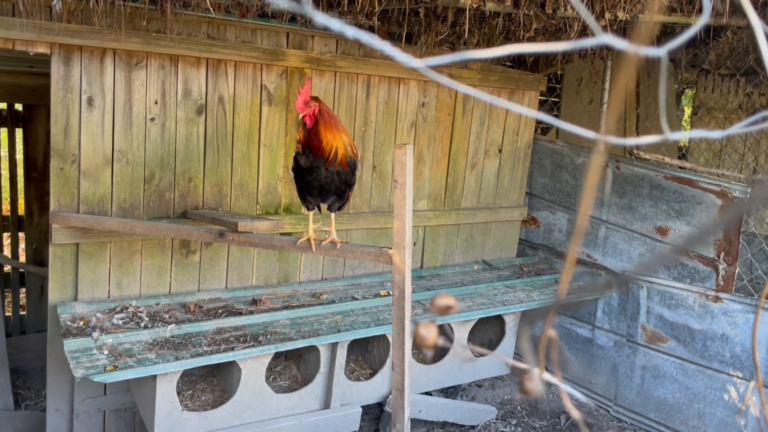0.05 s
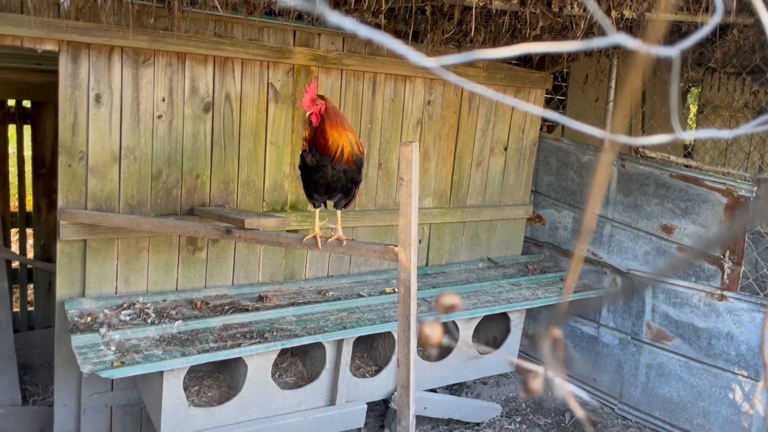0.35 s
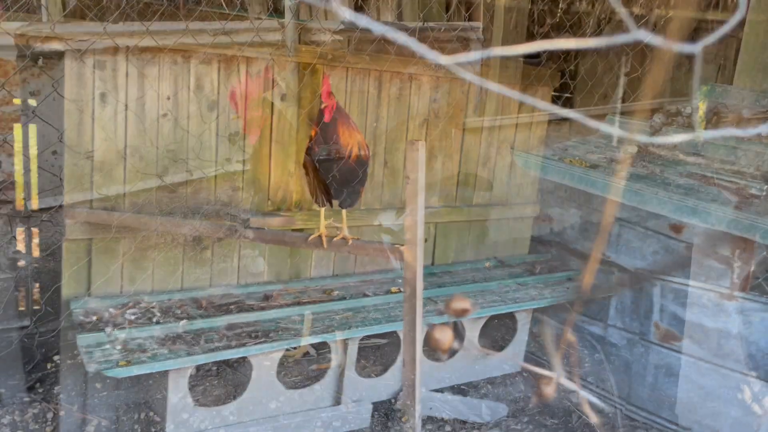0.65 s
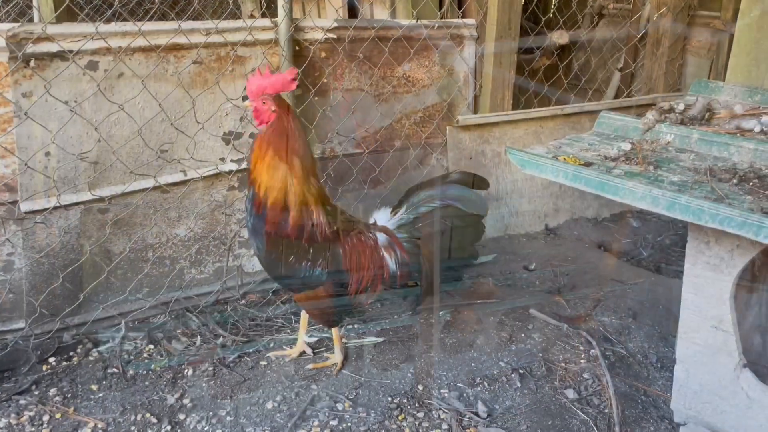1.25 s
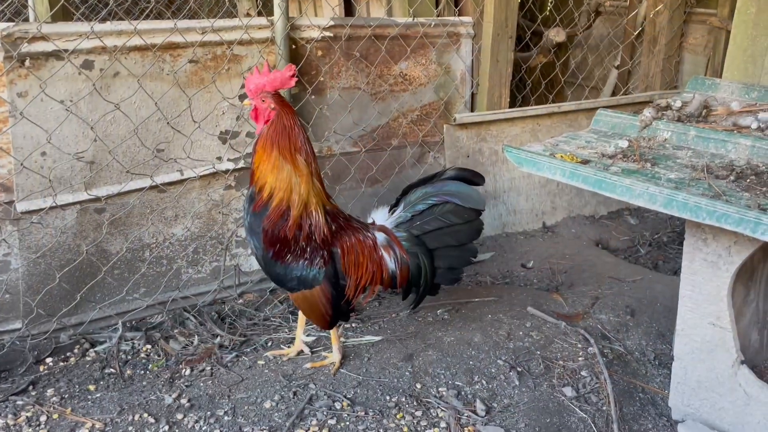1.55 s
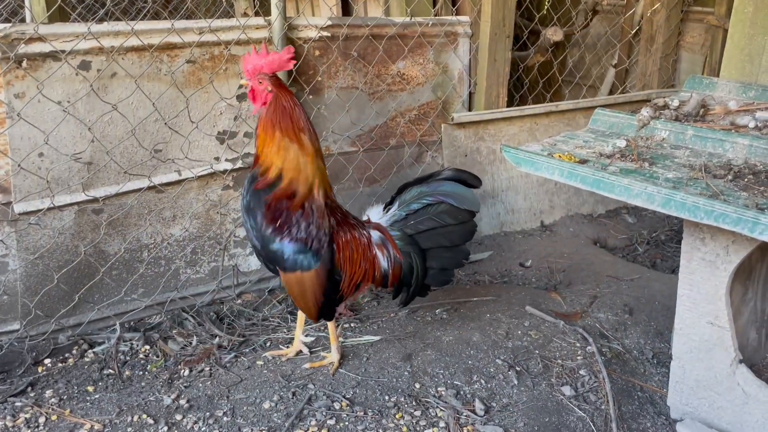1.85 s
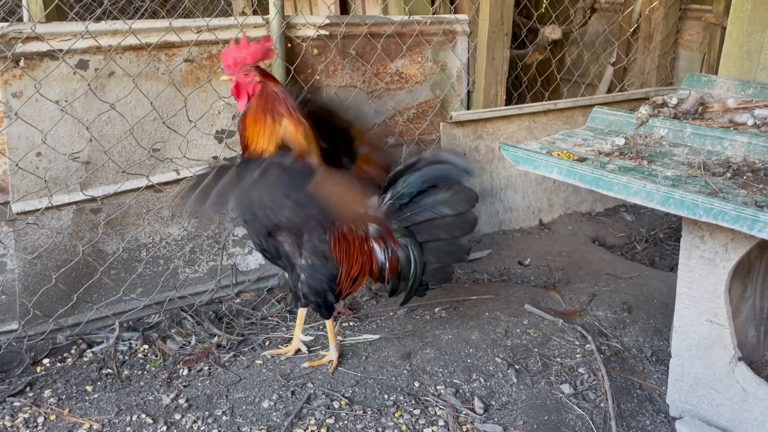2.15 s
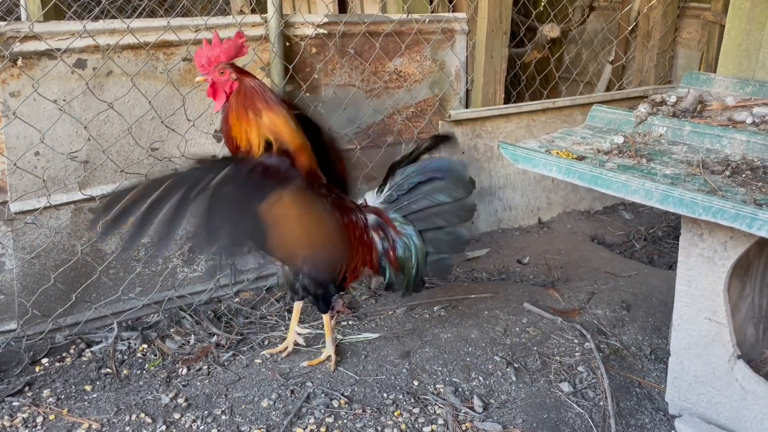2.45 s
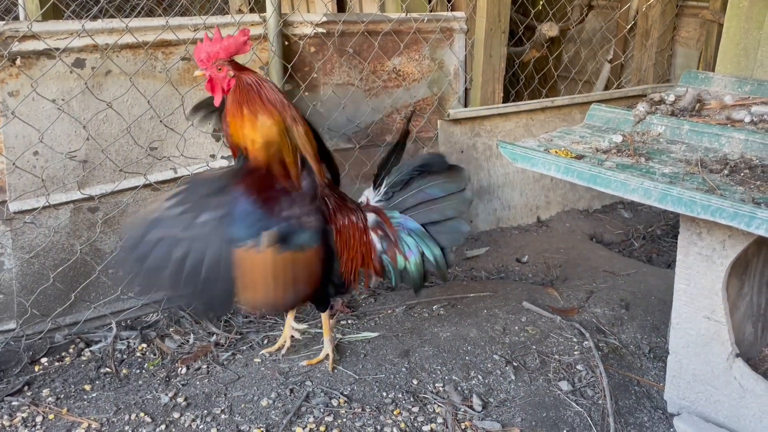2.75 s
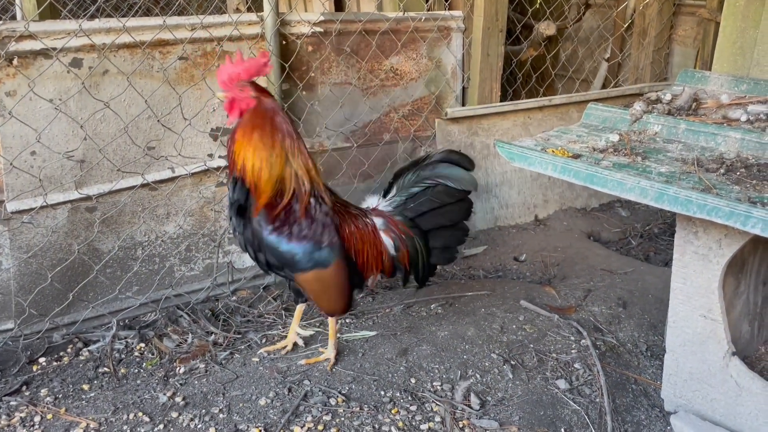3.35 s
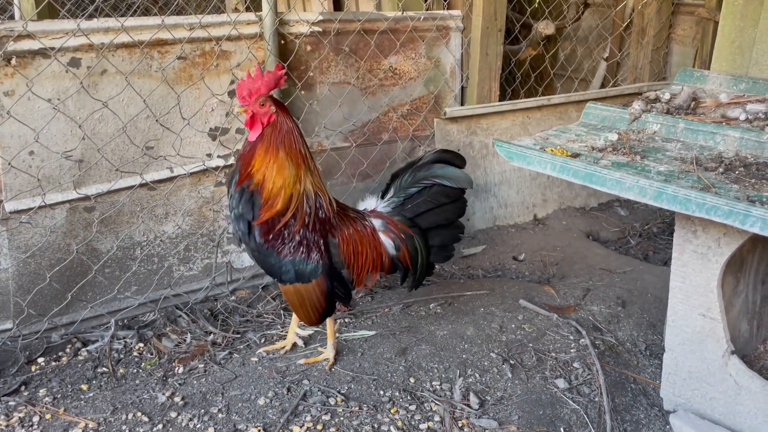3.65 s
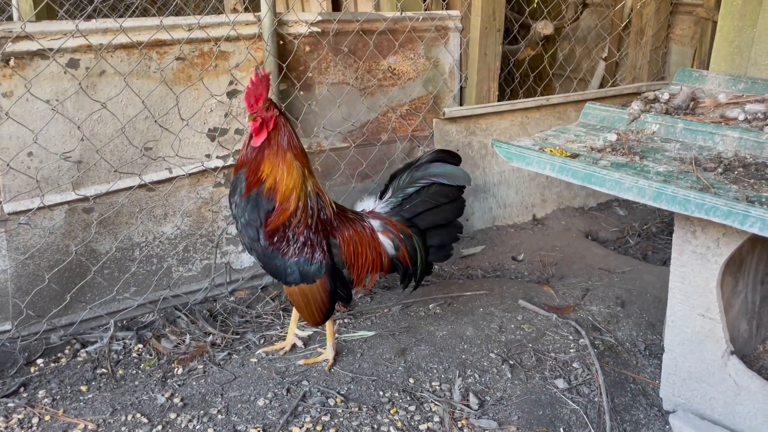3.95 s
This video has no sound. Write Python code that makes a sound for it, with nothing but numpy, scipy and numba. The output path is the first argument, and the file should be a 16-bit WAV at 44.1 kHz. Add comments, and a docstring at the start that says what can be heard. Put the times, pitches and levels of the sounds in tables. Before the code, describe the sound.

Rooster clucking softly, then loudly after beating his wings, with faint small birds outdoors.

```python
"""Rooster in a fenced pen

A rooster clucks softly, draws out a low two-voiced growl, beats his wings and ends with four loud
notes: cluck, squawk, cluck, cluck. His voice is a source and a filter: pulses from the syrinx excite
resonances of throat, body and beak. His wings push air and rustle. Small birds peep nearby, and
boards and walls add a short echo to the calls, over a quiet outdoor background that swells early on."""
import sys
import numpy as np
from scipy import signal
from scipy.fft import rfft, irfft
from scipy.io import wavfile
from scipy.ndimage import map_coordinates
from numba import njit

SR = 44100
rng = np.random.default_rng(int(sys.argv[2]) if len(sys.argv) > 2 else 0)


def transcribe(signal):
    """Save signal, clipped to [-1, 1], as a 16-bit WAV file at the path in sys.argv[1]."""
    frames = np.atleast_2d(signal).T
    limited = np.clip(frames, -1, 1)
    pcm = np.round(limited * 32767).astype(np.int16)
    wavfile.write(sys.argv[1], SR, pcm)


N = 176400
T = np.arange(N) / SR

# clucks (peak time [s], rise [s], pitch [Hz], level [dB], throat resonance [Hz], beak re throat [dB])
CLUCK_NOTES = [(0.476, 0.021, 304.3, -59.5, 630, -21), (0.587, 0.014, 272.3, -55, 504, -31),
               (.733, 0.018, 220.8, -47, 926, -21.5), (0.909, 0.035, 212.7, -44, 805, -18),
               (1.819, 0.031, 215.7, -33, 832, -19), (3.2, .023, 268.2, -28, 870, -12),
               (3.414, .019, 252.1, -27, 865, -6.5), (3.6, 0.019, 277.6, -27, 819, -13.5)]
# resonances of the body (frequency [Hz], bandwidth [Hz], gain [dB])
BODY_MODES = [(238, 180, -14.5), (636, 520, -8)]
# resonances of the open beak (frequency [Hz], bandwidth [Hz], gain [dB])
BEAK_MODES = [(2012, 134, -3.5), (2280, 85, -2.5), (2590, 390, -14.5), (3750, 65, -19), (6220, 220, -22)]
# louder clucks keep less bass (level [dB], high-pass cutoff [Hz])
CLUCK_BASS_CUT = [(-47, 130), (-27, 340)]
# fundamental of the growl (time [s], pitch [Hz])
GROWL_MELODY = [(1.0, 304.8), (1.2, 307.4), (1.42, 283.9), (1.45, 314.7), (1.495, 301), (1.61, 292.2)]
# first voice of the growl (time [s], level [dB])
GROWL_LEVEL = [(.995, -56), (1.02, -45.5), (1.205, -48.5), (1.3, -40.5), (1.328, -54.5), (1.35, -37.5),
               (1.385, -41), (1.475, -47), (1.52, -40), (1.56, -47.5), (1.595, -39.5), (1.612, -74)]
# second voice of the growl (time [s], level [dB])
SECOND_VOICE_LEVEL = [(1.0, -49.5), (1.29, -55.5), (1.35, -64), (1.42, -43.5), (1.48, -72)]
# rising resonance of the opening throat (time [s], frequency [Hz])
GROWL_FORMANT = [(1.16, 740), (1.3, 886)]
# throat response in the growl (frequency [Hz], gain [dB])
GROWL_TRACT = [(150, -55), (300, -4), (450, -11), (600, -1), (890, -1), (1170, -14), (2800, -25),
               (7000, -59.5)]
# course of the squawk (time [s], pitch [Hz], level [dB], beak resonance [Hz])
SQUAWK_CONTOUR = [(3.25, 573, -46, 1380), (3.268, 624.4, -26.5, 1880), (3.279, 635.4, -24, 2030),
                  (3.3, 600, -33.5, 2600), (3.31, 586, -69, 2300)]
# throat response in the squawk (frequency [Hz], gain [dB])
SQUAWK_TRACT = [(200, -30), (620, 6.5), (1240, -10), (2400, -9.5), (3100, -27), (3750, -12.5), (4400, -28),
                (12000, -59)]
# wing strokes (peak time [s], level [dB])
WING_STROKES = [(2.04, -61.5), (2.313, -54.5), (2.578, -53), (2.749, -54), (2.829, -51), (2.991, -56.5),
                (3.109, -58.5), (3.274, -58.5), (3.54, -62.5)]
# quill snaps (time [s], level [dB])
QUILL_SNAPS = [(1.79, -45), (2.026, -53.5), (2.169, -59), (2.463, -50.5), (2.551, -48.5), (2.705, -51),
               (2.791, -50.5), (2.963, -51.5), (3.365, -57.5), (3.417, -55.5), (3.513, -55)]
# feather rustle as the microphone colours it, with a notch near 8.6 kHz
# (frequency [Hz], relative level [dB])
RUSTLE_AT_MIC = [(200, -44), (700, 9.5), (7000, 4), (8600, -22), (10500, 1.5), (14000, 2)]
# air pushed by the wings (frequency [Hz], relative level [dB])
AIR_SPECTRUM = [(20, -2), (55, 8.5), (300, -10.5), (750, -6.5), (3000, -35)]
# peeps of small birds (start [s], duration [s], top pitch [Hz], level [dB])
BIRD_PEEPS = [(0.916, 0.067, 3300, -61.5), (1.041, 0.062, 3030, -62), (1.15, 0.08, 3568, -56),
              (1.291, 0.073, 3463, -57.5), (1.451, 0.074, 3430, -58), (2.28, .075, 2890, -61),
              (2.406, 0.087, 3295, -60)]
# falling whistles of other birds (start [s], duration [s], first pitch [Hz], level [dB])
BIRD_WHISTLES = [(2.224, .14, 4740, -72.5), (2.572, 0.049, 3440, -61.5), (2.63, 0.094, 4330, -73),
                 (2.64, 0.16, 3640, -62.5), (2.862, .125, 3655, -58.5), (3.744, 0.063, 4050, -72.5),
                 (3.904, 0.078, 4480, -67.5)]
# thin high lisps (peak time [s], rise [s], fall [s], level [dB])
BIRD_LISPS = [(.098, 0.089, 0.037, -75), (.22, 0.07, 0.17, -81)]
# steady hush (frequency [Hz], relative level [dB])
HUSH_SPECTRUM = [(60, 1.5), (2490, -7), (7000, -15.5), (10700, -47), (14500, -17)]
# outdoor rumble (frequency [Hz], relative level [dB])
RUMBLE_SPECTRUM = [(20, -36), (60, -2), (200, -14.5), (450, -12), (8600, -40), (14000, -40.5)]
# stereo width of diffuse sound (frequency [Hz], side re mid [dB])
DIFFUSE_WIDTH = [(120, -12.5), (350, -5), (8600, 2.5), (13000, -7.5)]


def syrinx(t, hz, jitter, rough, harmonics=40):
    """Modulated airflow: uneven, slightly smeared pulses with a puff of noise in every cycle."""
    phase = turns(hz * (1 + jitter * walk(t, 350.7)))
    k = np.arange(1, harmonics + 1)[:, None]
    pulses = np.cos(k * phase + k ** 2 / 10).sum(0) / np.sqrt(harmonics / 2)
    puffs = unit(rng.standard_normal(len(t)) * (1 + np.cos(phase)))
    return pulses + rough * puffs * np.sqrt(SR / 2 / (harmonics * np.mean(hz)))


def clucks():
    """Forced resonance: rough bursts, arching in pitch, ring throat and body, then the opening beak."""
    onset_s, throat_width_hz = .004, 59
    beak_lag_s, beak_climb_per_s = .0027, 1.4
    out = np.zeros(N)
    for peak, rise, hz, db, throat_hz, beak_db in CLUCK_NOTES:
        fall = 1.164 * rise
        t = span(peak - rise - onset_s, peak + 2 * fall)
        effort = swell(t, peak, rise, fall)
        arch = 1 - .029 * ((t - peak) / fall) ** 2
        onset = np.clip((t - t[0]) / onset_s, 0, 1)
        source = onset * syrinx(t, hz * arch, jitter=.05, rough=.5)
        throat = ring(effort * source, BODY_MODES + [(throat_hz, throat_width_hz, 0)])
        throat = colour(throat, [(1000, 26.5), (8000, -34.5)])
        cutoff_hz, = curve(db, CLUCK_BASS_CUT)
        throat = signal.sosfilt(signal.butter(3, cutoff_hz, "high", fs=SR, output="sos"), throat)
        opening = swell(t, peak + beak_lag_s, rise, fall)
        climb = 1 + beak_climb_per_s * (t - peak - beak_lag_s)
        beak = sum(amp(mode_db) * sweep(opening * source, mode_hz * climb, float(width))
                   for mode_hz, width, mode_db in BEAK_MODES)
        beak = signal.sosfilt(signal.butter(2, 3520, fs=SR, output="sos"), beak)
        note = unit(unit(throat) + amp(beak_db) * unit(beak))
        add(out, t, amp(db) * note * np.sqrt(np.mean(effort ** 2)))
    return out


def growl():
    """Biphonation: the syrinx sounds a low pulsed note and an inharmonic second voice at once."""
    clearing_db, second_ratio = -44.5, 2.38
    t = span(GROWL_LEVEL[0][0], GROWL_LEVEL[-1][0])
    hz, = curve(t, GROWL_MELODY)
    db, = curve(t, GROWL_LEVEL)
    hoarse = np.minimum(amp(clearing_db - db), 1)  # the louder, the clearer
    source = syrinx(t, hz, jitter=.02 * hoarse, rough=.36 * hoarse)
    source *= amp(4 * hoarse * walk(t, 260))  # shimmer
    formant = amp(6.5) * sweep(source, curve(t, GROWL_FORMANT)[0], width_hz=260.)
    first = amp(db) * unit(colour(source + formant, GROWL_TRACT))
    phase = turns(second_ratio * hz * (1 + .04 * walk(t, 198)))
    tone = np.sin(phase) + amp(-17.5) * np.sin(2 * phase)
    second = unit(tone * amp(2.1 * walk(t, 147.3)))
    return t, first + amp(curve(t, SECOND_VOICE_LEVEL)[0]) * second


def squawk():
    """Formant sweep: the beak's resonance lifts harmonics 2 to 4 of a clear high note in turn."""
    t = span(SQUAWK_CONTOUR[0][0], SQUAWK_CONTOUR[-1][0])
    hz, db, beak_hz = curve(t, SQUAWK_CONTOUR)
    voice = syrinx(t, hz, jitter=.018, rough=.25, harmonics=24)
    for k in range(2, 5):
        in_tune = np.exp(-((k * hz - beak_hz) / 260) ** 2)
        voice += amp(10.5) * in_tune * ring(voice, [(k * np.median(hz), 400, 0)])
    return t, amp(db) * unit(colour(voice, SQUAWK_TRACT))


def wings():
    """Friction and air displacement: strokes rustle feathers and push air; quills snap as wings turn."""
    snap_decay_s, air_db = .016, 5
    strokes = np.sqrt(sum((amp(db) * swell(T, peak, rise=.065, fall=.11)) ** 2
                          for peak, db in WING_STROKES))
    snaps = sum(amp(db) * (T > s) * np.exp(-np.abs(T - s) / snap_decay_s) for s, db in QUILL_SNAPS)
    grain = unit(amp(2 * walk(T, 900) + 1.5 * walk(T, 90)))
    flutter = unit(amp(2.5 * walk(T, 60)))
    rustle = np.hypot(strokes, snaps) * grain
    push = amp(air_db) * strokes * flutter
    return diffuse(*[rustle * noise(RUSTLE_AT_MIC) + push * noise(AIR_SPECTRUM) for _ in range(2)])


def trill(t, hz, jitter):
    """Random frequency and amplitude modulation: a trembling bird note that fades in and out."""
    fade = np.sin(np.linspace(0, np.pi, len(t)))
    tone = 2 * np.sin(turns(hz * (1 + jitter * walk(t, 900))))
    return fade * tone * amp(3 * walk(t, 170))


def small_birds():
    """Frequency glides: arched peeps with a rasp beneath and falling whistles, plus two noisy lisps."""
    jitter, crest = .02, .408  # shares of the pitch and of a peep's duration
    out = np.zeros(N)
    for start, length, top_hz, db in BIRD_PEEPS:
        t = span(start, start + length)
        progress = (t - start) / length
        from_crest = np.abs(progress - crest) / np.where(progress < crest, crest, 1 - crest)
        hz = top_hz * (1 - .24 * from_crest ** 2.6)
        tone = trill(t, hz, jitter)
        rasp = amp(-15) * trill(t, .88 * hz, np.pi * jitter)
        add(out, t, amp(db) * (tone + rasp))
    for start, length, first_hz, db in BIRD_WHISTLES:
        t = span(start, start + length)
        bend = (1 - np.cos(np.pi * (t - start) / length)) / 2
        add(out, t, amp(db) * trill(t, first_hz * (1 - .2 * bend), jitter))
    hiss = noise([(7000, -36), (8300, -9), (12000, -40)])
    lisps = sum(amp(db) * swell(T, peak, rise, fall) for peak, rise, fall, db in BIRD_LISPS)
    return out + hiss * lisps


def pen(x, left_re_right_db):
    """Reflection: boards and walls follow the direct sound with a short, dense echo."""
    wall_delay_s, early_t60_s, late_t60_s, echo_db = .0045, .027, .14, -4
    t = span(0, .5)
    decay = (t > wall_delay_s) * (amp(-60 * t / late_t60_s) + amp(-60 * t / early_t60_s))
    responses = [colour(rng.standard_normal(len(t)) * decay, [(3000, 2.3), (12000, 8.3)])
                 for _ in range(2)]
    echo = np.array([signal.fftconvolve(x, h)[:N] for h in responses]) / np.sqrt(np.sum(decay ** 2))
    pan = amp(np.array([[left_re_right_db], [-left_re_right_db]]) / 2)
    return pan * x + amp(echo_db) * echo


def background():
    """Ambient noise: a steady hush, joined by a fuller outdoor rumble."""
    hush_db, rumble_db, swell_s = -70.5, -57, (.56, 1.4)
    rumble_gain = amp(rumble_db) * np.interp(T, swell_s, [0, 1])
    return diffuse(*[amp(hush_db) * noise(HUSH_SPECTRUM) + rumble_gain * noise(RUMBLE_SPECTRUM)
                     for _ in range(2)])


def amp(db):
    """Amplitude ratio of a level in decibels."""
    return 10 ** (np.asarray(db) / 20)


def unit(x):
    """Normalisation to an RMS of 1."""
    return x / np.sqrt(np.mean(x ** 2) + 1e-18)


def curve(t, rows):
    """Linear interpolation of a table's later columns, where its first equals t."""
    knots, *columns = np.array(rows, float).T
    return [np.interp(t, knots, column) for column in columns]


def span(start, end):
    """Sample times of an interval."""
    return T[max(int(start * SR), 0):int(end * SR)]


def add(out, t, x):
    """Superposition of x on out from the time t[0]."""
    i = int(round(t[0] * SR))
    out[i:i + len(x)] += x


def colour(x, points):
    """Minimum-phase filter through (frequency [Hz], gain [dB]) points."""
    hz, db = np.array(points, float).T
    bins_hz = np.maximum(np.fft.rfftfreq(8192, 1 / SR), 1)
    cepstrum = irfft(np.log(amp(np.interp(np.log(bins_hz), np.log(hz), db))))
    half = len(cepstrum) // 2
    folded = np.r_[cepstrum[0], 2 * cepstrum[1:half]]
    response = irfft(np.exp(rfft(folded, 2 * half)))
    return signal.fftconvolve(x, response)[:len(x)]


def ring(x, modes):
    """Parallel resonators (frequency [Hz], bandwidth [Hz], gain [dB])."""
    return sum(amp(db) * signal.lfilter(*signal.iirpeak(hz, hz / width, fs=SR), x)
               for hz, width, db in modes)


@njit
def sweep(x, hz, width_hz):
    """Time-varying resonator with a gain of 1 at its moving centre."""
    out, band_state, low_state = np.empty(len(x)), 0., 0.
    for i in range(len(x)):
        tuning, damping = np.tan(np.pi * hz[i] / SR), width_hz / hz[i]
        band = (band_state + tuning * (x[i] - low_state)) / (1 + tuning * (tuning + damping))
        band_state = 2 * band - band_state
        low_state += 2 * tuning * band
        out[i] = damping * band
    return out


def walk(t, rate_hz):
    """Smooth random modulation with a standard deviation near 1."""
    return map_coordinates(rng.standard_normal(4096), [(t - t[0]) * rate_hz], order=2, mode="wrap")


def swell(t, peak, rise, fall):
    """Envelope that is 20 dB down one rise before and one fall after its peak."""
    return amp(-20 * np.abs((t - peak) / np.where(t < peak, rise, fall)) ** 1.345)


def turns(hz):
    """Phase in radians, the integral of frequency."""
    return 2 * np.pi * np.cumsum(hz) / SR


def noise(spectrum):
    """Spectrally shaped Gaussian noise with an RMS of 1."""
    return unit(colour(rng.standard_normal(N), spectrum))


def diffuse(mid, side):
    """Partial coherence: independent mid and side signals spread a sound between left and right."""
    side = colour(side, DIFFUSE_WIDTH)
    return np.array([mid + side, mid - side])


def scene():
    """Superposition: the calls and their echoes add to the wingbeats and the background."""
    voice = clucks()
    add(voice, *growl())
    add(voice, *squawk())
    calls = pen(voice, left_re_right_db=-2) + pen(small_birds(), left_re_right_db=9.5)
    return calls + wings() + background()


def record(dry):
    """Band limiting: a steep low-pass filter removes the highest treble."""
    cutoff_hz = 15750
    return signal.sosfilt(signal.ellip(10, .2, 70, cutoff_hz, fs=SR, output="sos"), dry)


dry = scene()
out = record(dry)
transcribe(out)
```